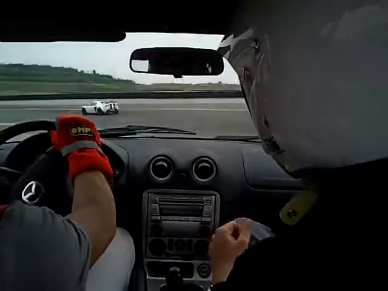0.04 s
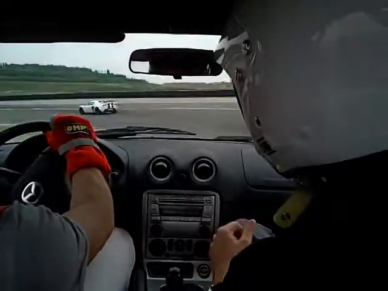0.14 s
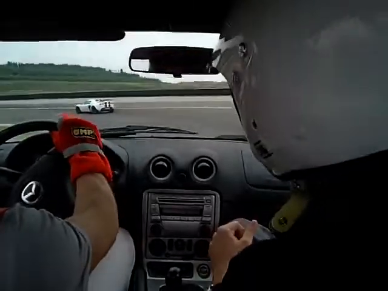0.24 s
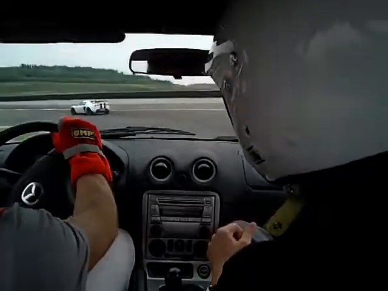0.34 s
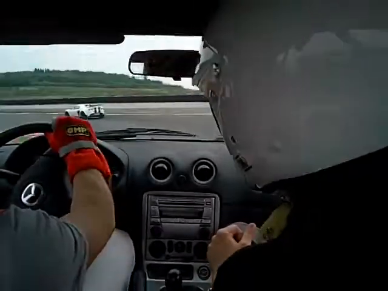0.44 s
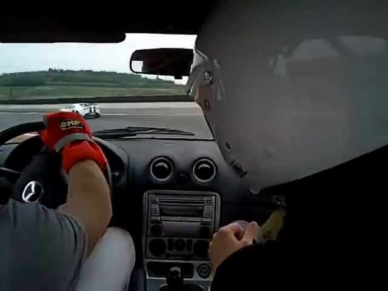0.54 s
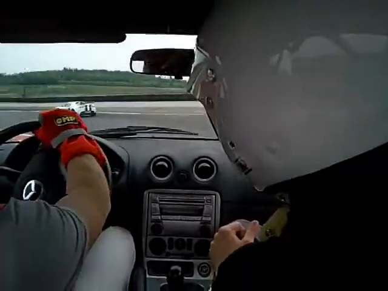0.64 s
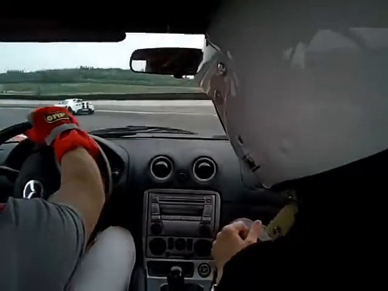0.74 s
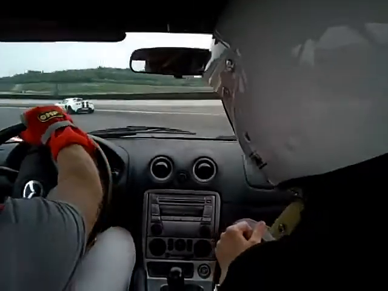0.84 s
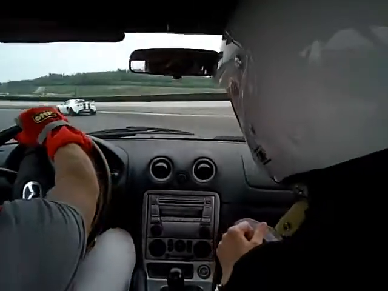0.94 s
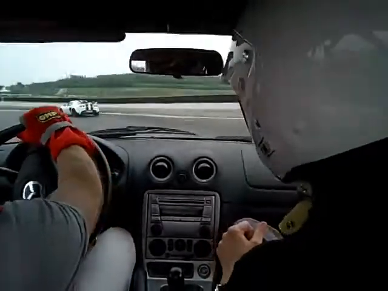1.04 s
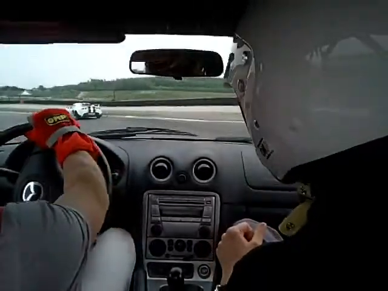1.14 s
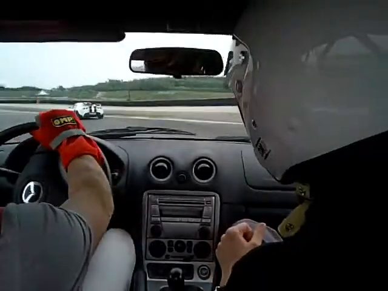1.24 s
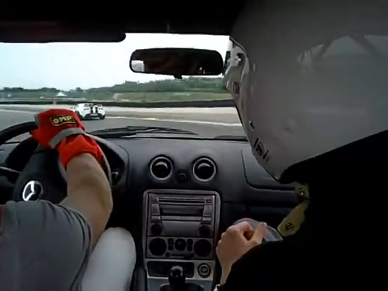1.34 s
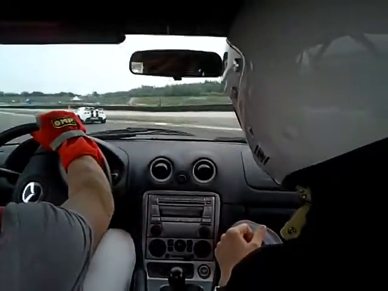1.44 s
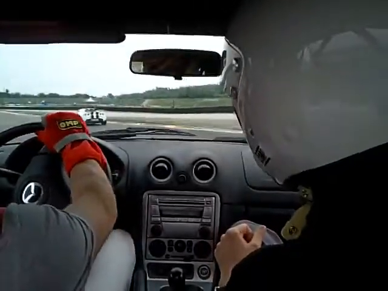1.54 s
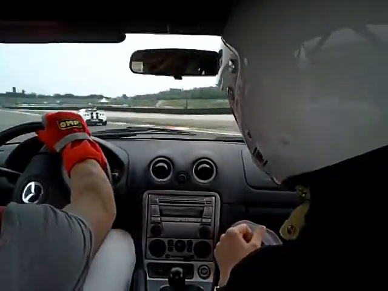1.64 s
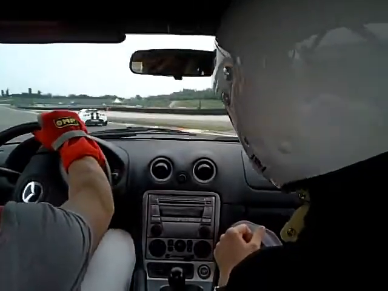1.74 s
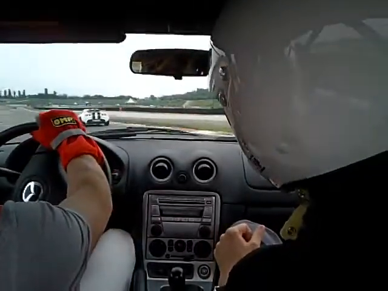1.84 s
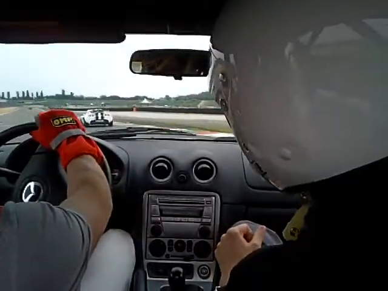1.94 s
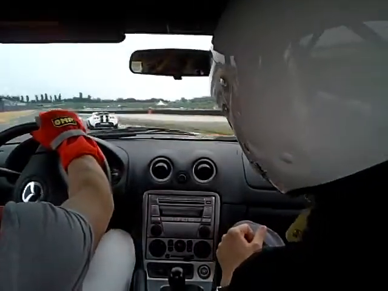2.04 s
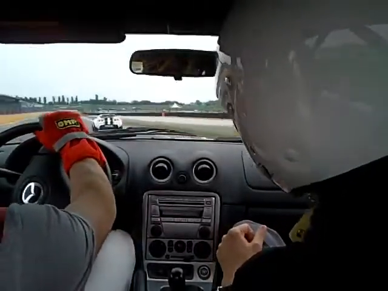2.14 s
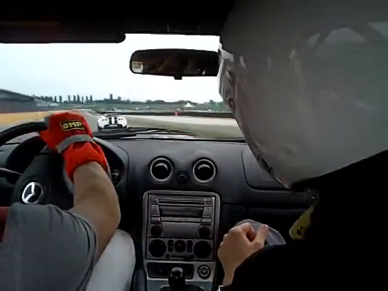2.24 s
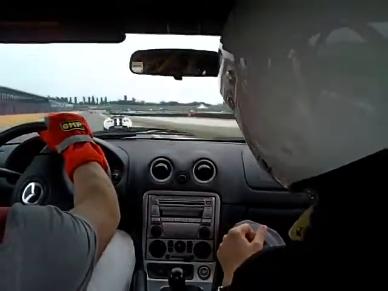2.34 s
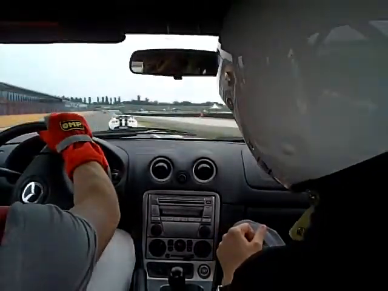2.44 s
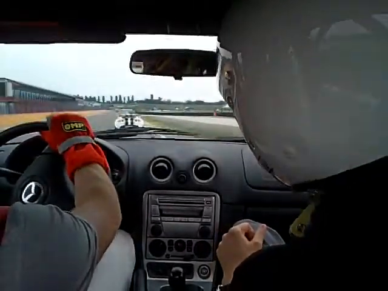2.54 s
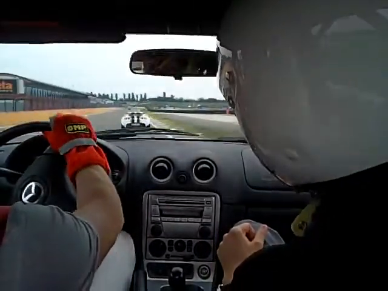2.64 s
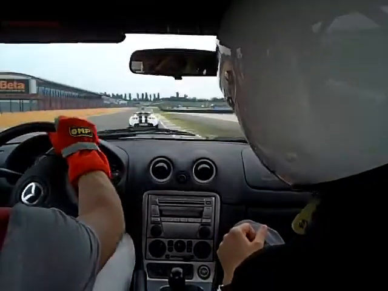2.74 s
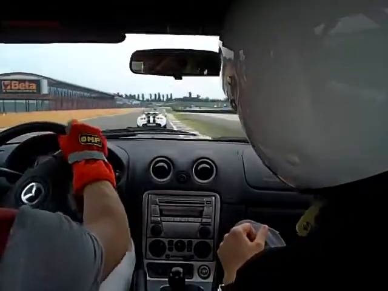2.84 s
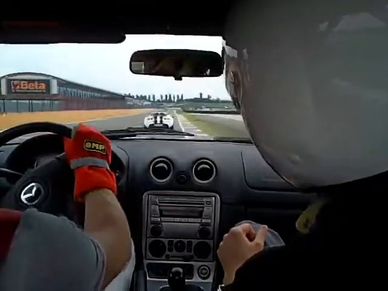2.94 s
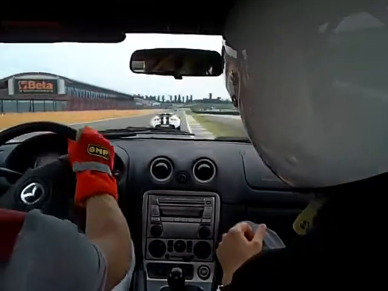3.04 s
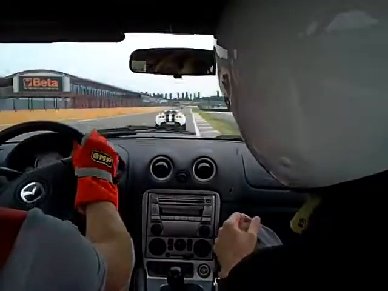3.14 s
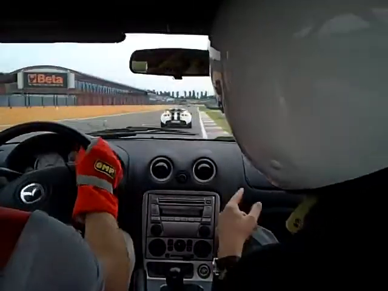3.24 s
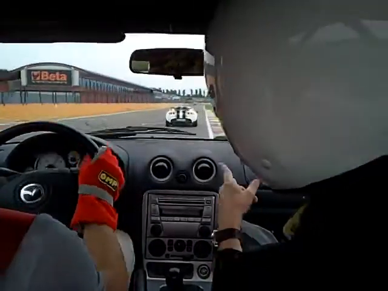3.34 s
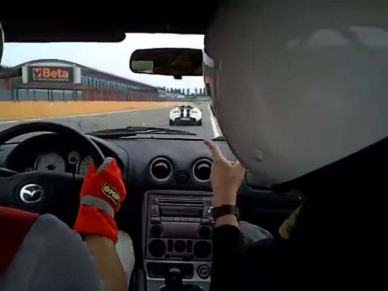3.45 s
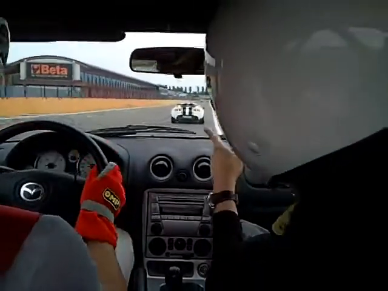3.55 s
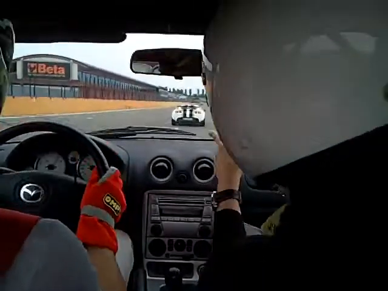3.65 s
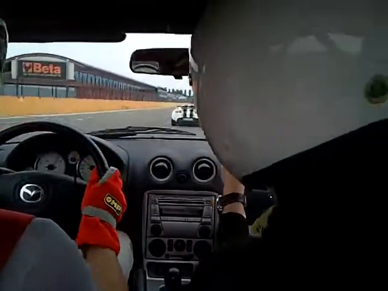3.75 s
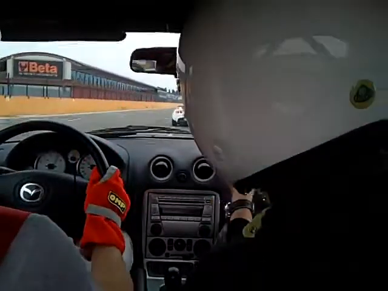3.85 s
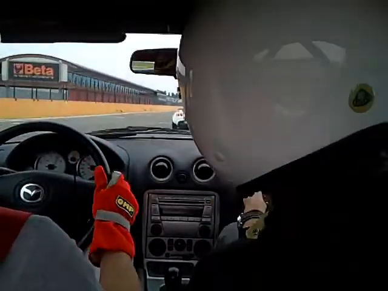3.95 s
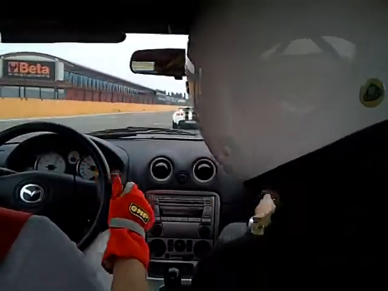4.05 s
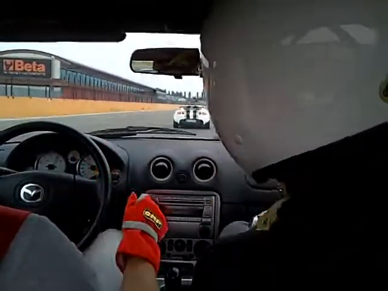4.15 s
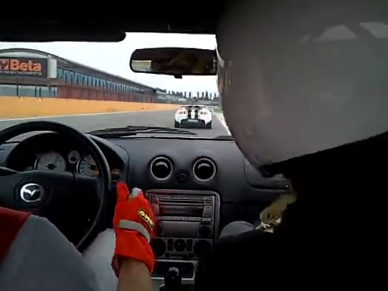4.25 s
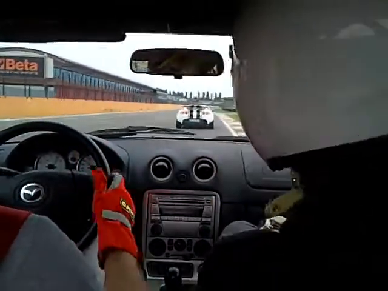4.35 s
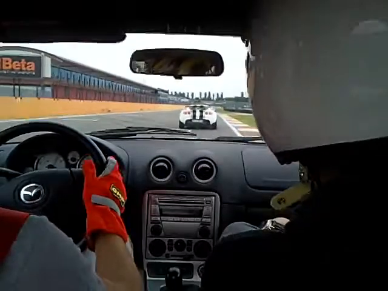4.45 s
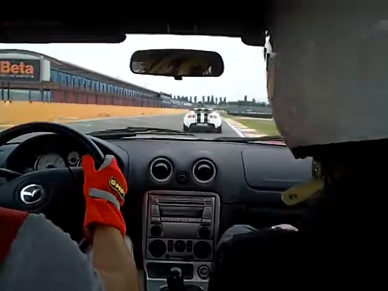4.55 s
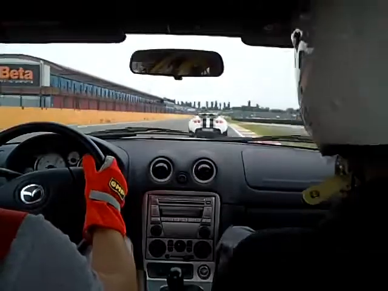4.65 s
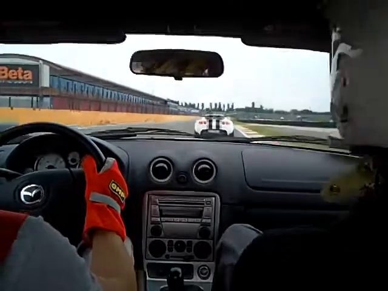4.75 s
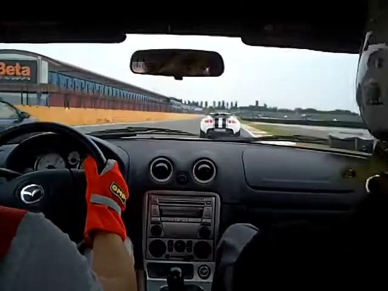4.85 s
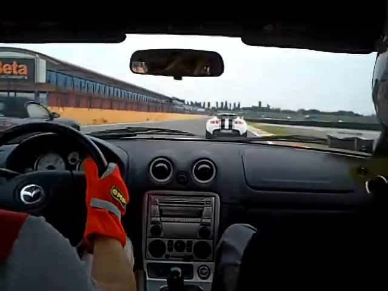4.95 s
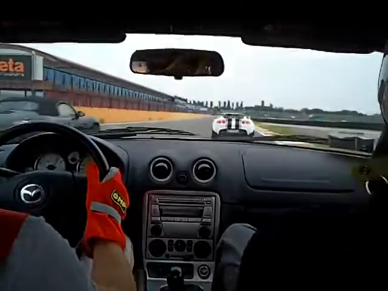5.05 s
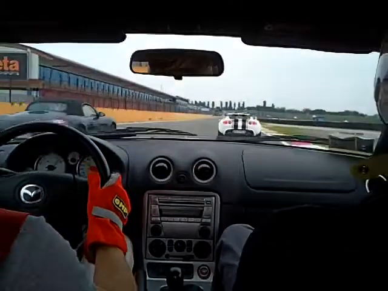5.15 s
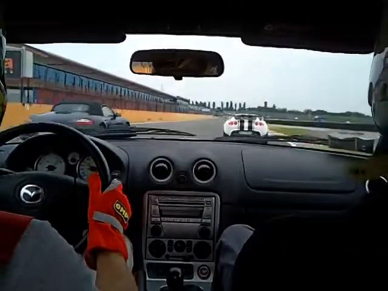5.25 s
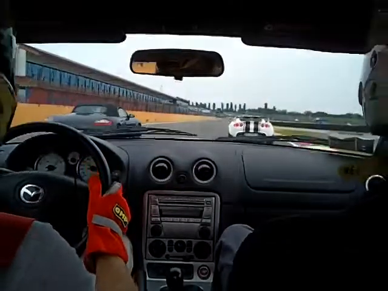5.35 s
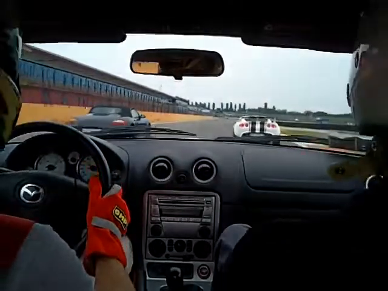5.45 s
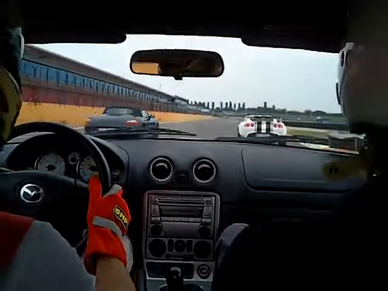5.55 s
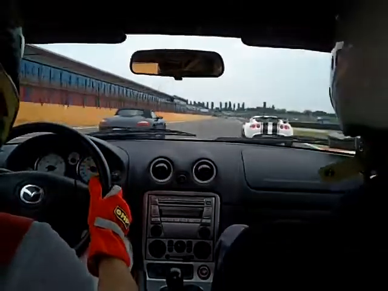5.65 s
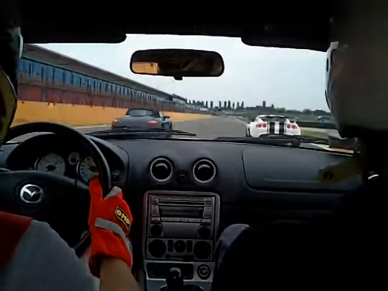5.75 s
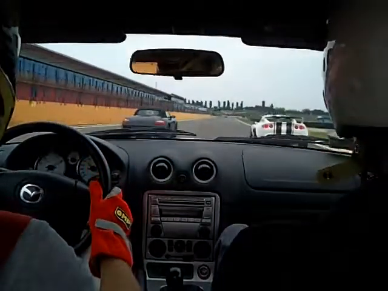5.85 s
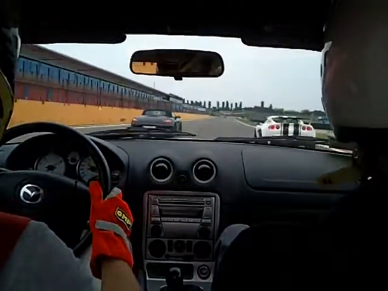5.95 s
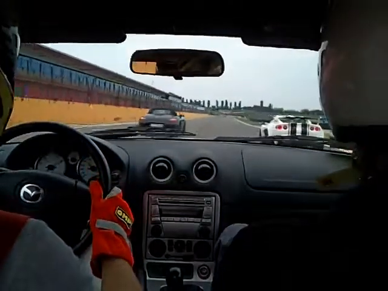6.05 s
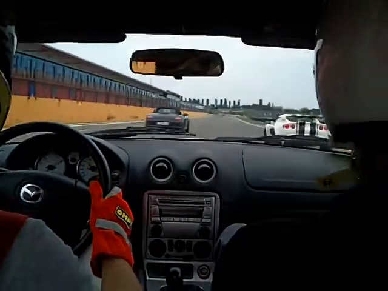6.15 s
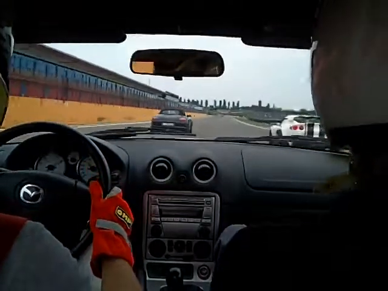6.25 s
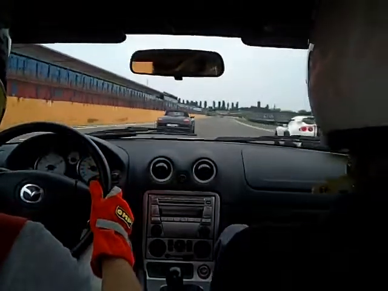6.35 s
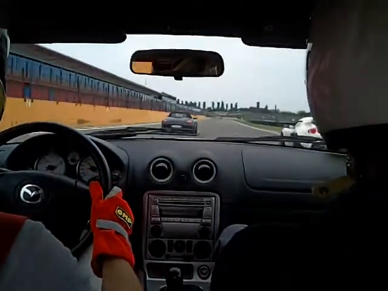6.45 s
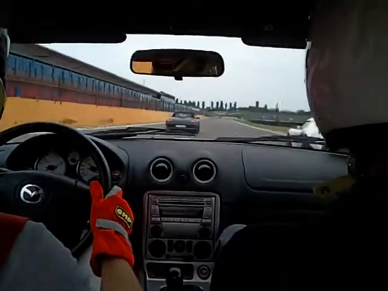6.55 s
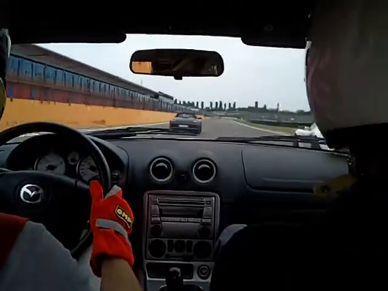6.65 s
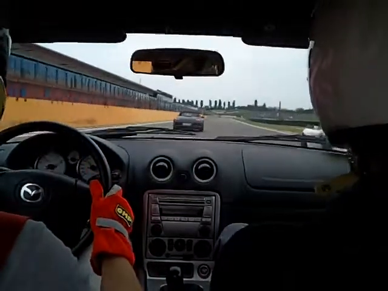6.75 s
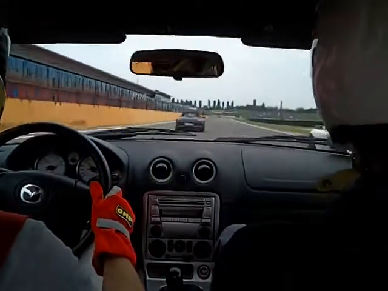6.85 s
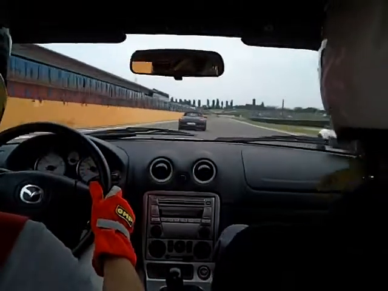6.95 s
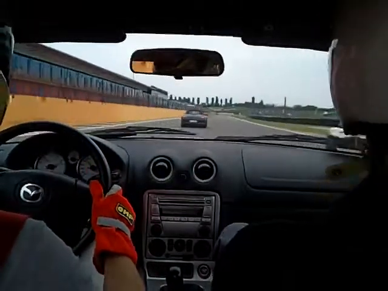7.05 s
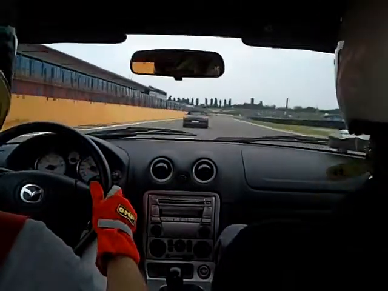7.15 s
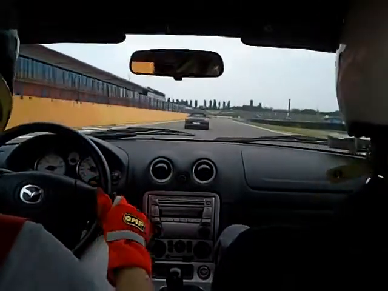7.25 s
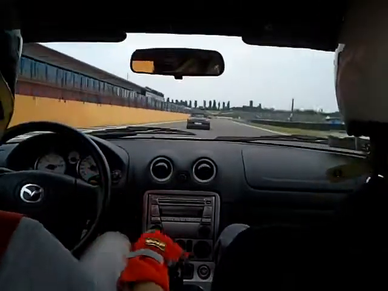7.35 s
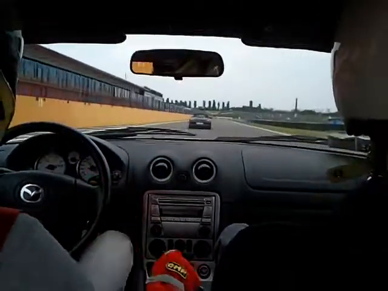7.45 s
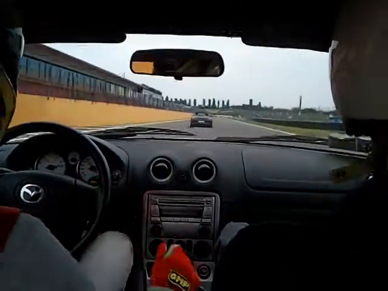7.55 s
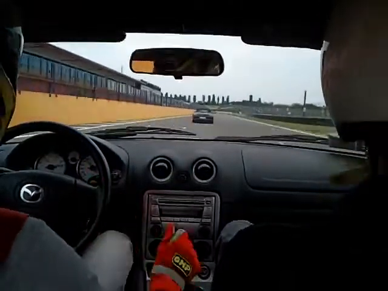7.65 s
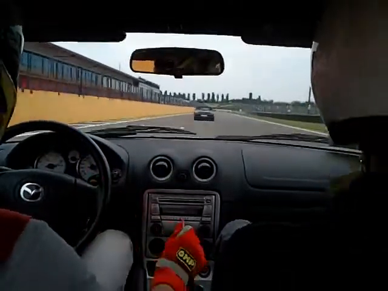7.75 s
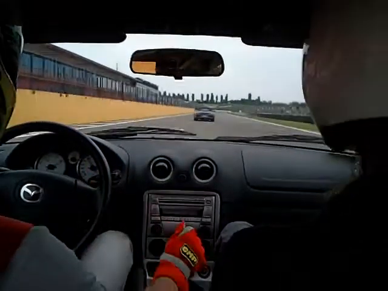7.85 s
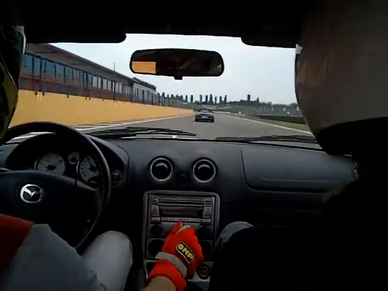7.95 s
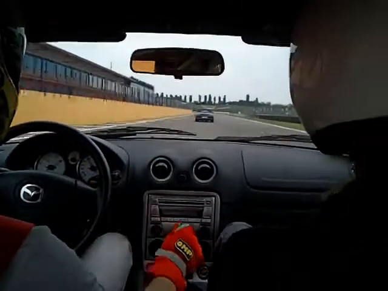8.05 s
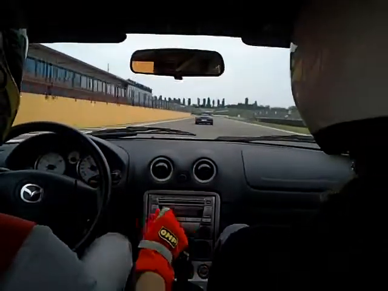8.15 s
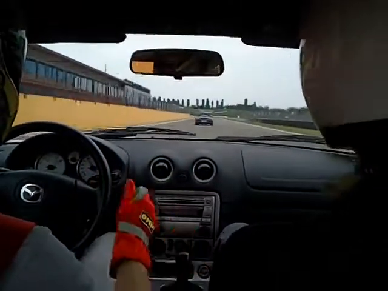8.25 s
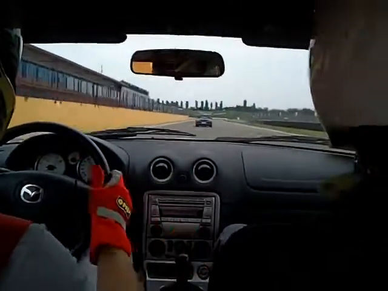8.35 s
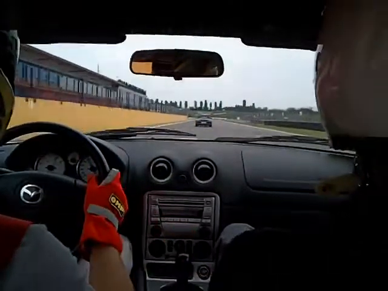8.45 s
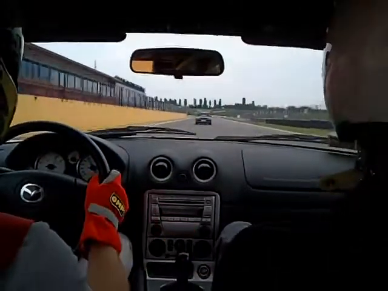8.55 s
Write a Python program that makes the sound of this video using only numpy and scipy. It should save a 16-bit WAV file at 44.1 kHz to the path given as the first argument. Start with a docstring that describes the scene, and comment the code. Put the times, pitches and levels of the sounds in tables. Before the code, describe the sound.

Muffled cabin roar with rattling plastic, a booming four-cylinder engine climbing under full throttle, a passing raspy exhaust, and a sharp pitch drop at a gear change.

```python
"""Tyre and wind noise, a ribbed kerb and rattling trim come first, inside a small car on a race track.
Its four-cylinder engine pulls, eases, pulls hard and drops for an upshift. It is built from multiples
of its cycle rate, called orders, which boom as they sweep through the air modes of the cabin.
Other cars drone as wavering notes; one roars past as uneven exhaust pulses. Road noise is filtered noise.
Trim rattles are short snaps, and a narrow-band microphone clips the loudest peaks."""
import sys
import numpy as np
from scipy import signal
from scipy.fft import rfft, irfft
from scipy.io import wavfile

SR = 44100
rng = np.random.default_rng(int(sys.argv[2]) if len(sys.argv) > 2 else 0)


def master(y):
    """Save y as 16-bit WAV."""
    cut = np.clip(np.atleast_2d(y).T, -1, 1)
    pcm = np.round(cut * 32767)  # scale
    wavfile.write(sys.argv[1], SR, pcm.astype(np.int16))


N = 379260
TIME = np.arange(N) / SR


def amp(db):
    """Turns decibels into gain."""
    return 10 ** (np.asarray(db) / 20)


def unit(x):
    """Scales a sound to rms 1."""
    return x / np.sqrt(np.mean(x ** 2) + 1e-20)


def curves(rows):
    """Joins every column of a table by straight lines in time."""
    s, *columns = np.transpose(rows)
    return [np.interp(TIME, s, column) for column in columns]


def colour(x, points):
    """Filters by a spectrum of (f/Hz, level/dB), joined by straight lines over log frequency."""
    hz, db = np.transpose(points)
    bins_hz = np.fft.rfftfreq(N, 1 / SR)
    gain_db = np.interp(np.log(bins_hz + 1), np.log(hz), db)
    return irfft(rfft(x) * amp(gain_db), N)


def noise(points):
    """Makes noise of rms 1 with the given spectrum."""
    return unit(colour(rng.standard_normal(N), points))


def wander(hz, size=4096):
    """Makes a slow random curve of rms 1, changing up to about the given rate."""
    f = np.fft.rfftfreq(size, TIME[-1] / size)
    spectrum = rfft(rng.standard_normal(size)) / (1 + (f / hz) ** 2)
    slow = unit(irfft(spectrum, size))
    return np.interp(TIME, np.linspace(0, TIME[-1], size), slow)


def angle(hz):
    """Adds up a frequency curve into a running phase in radians."""
    return 2 * np.pi * np.cumsum(hz) / SR


def tone(phase, rough, flutter_hz, order=1):
    """Plays one multiple of a running phase at rms 1, with fluttering height and phase."""
    start = rng.uniform(0, 2 * np.pi)
    height = 1 + rough * wander(flutter_hz)
    slip = rough * wander(flutter_hz)
    return unit(height * np.cos(order * phase + start + slip))


def drone(rows, gain_db, octave_db, rough):
    """Plays a wavering note and its octave, fading in and out at the ends of its table."""
    hz, db = curves(rows)
    to_nearest_end = np.minimum(TIME - rows[0][0], rows[-1][0] - TIME)
    fade = np.clip(to_nearest_end / 0.0098, 0, 1)
    phase = angle(hz)
    note = tone(phase, rough, flutter_hz=16)
    octave = amp(octave_db) * tone(2 * phase, rough, flutter_hz=20)
    return fade * amp(db + gain_db) * (note + octave)


def lowpass(x, hz, size):
    """Cuts everything above a steep band limit."""
    taps = signal.firwin(size, hz, window=("kaiser", 8), fs=SR)
    return signal.oaconvolve(x, taps[None], "same")


# stretches of rough ground that shake the car: (start t/s, end t/s, shake level/dB)
ROUGH_GROUND = [(0.247, 0.782, -1.5), (3.207, 3.706, -3.5), (7.8, 8.05, -12.5)]
SHAKE_RISE_S, SHAKE_FALL_S, SMOOTH_SHAKE_DB = 0.24, 0.14, -13.5


def shaking():
    """How hard the car shakes: it builds up before each rough stretch, holds, and dies away."""
    shake = amp(SMOOTH_SHAKE_DB)
    for start, end, db in ROUGH_GROUND:
        early = np.maximum(start - TIME, 0) / SHAKE_RISE_S
        late = np.maximum(TIME - end, 0) / SHAKE_FALL_S
        shake = shake + amp(db) * np.exp(-early - late)
    return shake


PANEL_DB, PANEL_RISE_DB_PER_S = -14, 0.78  # level against the roar, and its steady growth


def panel(centre_hz=1470, width_hz=70):
    """A singing body panel: noise through one narrow resonance, growing steadily."""
    f = np.fft.rfftfreq(N, 1 / SR)
    resonance = 1 / (1 + ((f - centre_hz) / width_hz) ** 2)
    ring = irfft(rfft(rng.standard_normal(N)) * resonance, N)
    return amp(PANEL_DB + PANEL_RISE_DB_PER_S * TIME) * unit(ring)


# tyre and wind noise before shaking, throttle and passing tyres:
# (t/s, rumble level/dB, roar level/dB, hiss level/dB)
ROAD = [(0, -17.5, -25.5, -41), (.22, -20, -28, -45.5), (.4, -27, -33, -48.5), (1.03, -25, -34, -54.5),
        (1.2, -19, -29, -62), (1.5, -21.5, -32, -48.5), (2.05, -23.5, -31, -49.5),
        (2.4, -23.5, -31.5, -51.5), (3.2, -17, -27.5, -44.5), (3.9, -25.5, -31.5, -47.5),
        (5, -18, -39, -49), (5.5, -27, -37, -49.5), (6.4, -24, -31.5, -47.5), (6.95, -29, -34.5, -48),
        (7.4, -28, -31.5, -48), (8, -28, -35, -49), (8.3, -24.5, -32.5, -45), (8.6, -26.5, -35.5, -51.5)]
# spectra of the three noises, before scaling to rms 1: (f/Hz, level/dB)
RUMBLE_COLOUR = [(15, -21.5), (30, -6), (45, -7.5), (65, -4.5), (110, 3), (160, -1), (205, -3.5), (265, -1),
                 (340, -8.5), (470, -13), (700, -25.5), (1500, -54)]
ROAR_COLOUR = [(150, -11), (350, 1.5), (520, 4.5), (700, -1.5), (900, 1), (1080, -3.5), (1220, 1),
               (1370, -3.5), (1470, -12), (1600, -6), (1850, -11.5), (2300, -19), (3200, -31),
               (4500, -39.5)]
HISS_COLOUR = [(800, -18.5), (1600, -3), (2400, 0.5), (3100, -5.5), (3800, -8.5), (4400, -26.5),
               (6000, -16.5)]
# the tyres hit a ribbed kerb, skip, then hum along it: (t/s, f/Hz, level/dB before gain_db)
KERB_HUM = [(.21, 103.2, -35), (.25, 109, -4), (.315, 109, -22.5), (.38, 105, -12), (.82, 106.1, -14),
            (.93, 105.7, -28.5)]
# the tyres sing in the bend: (t/s, f/Hz, level/dB before gain_db)
TYRE_SONG = [(1.02, 905, -46), (1.17, 895, -35), (1.4, 916, -40)]
SHAKE_RUMBLE_DB, SHAKE_ROAR_DB = -21, -35.5  # added at a shake of 1
ROAR_THROTTLE_DB = 3.5  # lift from the rush of gas at full throttle
PASS_TYRES_DB = -22.5  # roar of the passing car at its closest


def road(cycle, throttle, shake):
    """Rumble and roar grow on rough ground; roar and hiss pulse with the engine and gust."""
    rumble_db, roar_db, hiss_db = curves(ROAD)
    # ripples at four, two and one per engine cycle
    pulsing = 1 + 0.26 * np.cos(4 * cycle) + 0.021 * np.cos(2 * cycle) + 0.11 * np.cos(cycle)
    gust = amp(1.2 * wander(hz=22))
    # independent noises add by power
    own_roar = np.hypot(amp(roar_db + ROAR_THROTTLE_DB * throttle), amp(SHAKE_ROAR_DB) * shake)
    roar_level = np.hypot(own_roar, amp(PASS_TYRES_DB) * nearness())
    rumble_level = np.hypot(amp(rumble_db), amp(SHAKE_RUMBLE_DB) * shake)
    rumble = rumble_level * noise(RUMBLE_COLOUR)
    rush = roar_level * noise(ROAR_COLOUR) + amp(hiss_db) * noise(HISS_COLOUR)
    kerb = drone(KERB_HUM, gain_db=0.8, octave_db=-27.5, rough=0.08)
    song = drone(TYRE_SONG, gain_db=2.5, octave_db=-24, rough=0.76)
    return rumble + kerb + song + unit(pulsing) * gust * rush + roar_level * panel()


# a faint high squeal: (t/s, f/Hz, level/dB before gain_db)
SQUEAL = [(2.83, 3720, -68), (2.94, 3740, -62), (3.06, 3700, -62)]


def squeal():
    """A thin wavering note with almost no octave."""
    return drone(SQUEAL, gain_db=4, octave_db=-43, rough=.35)


# thuds from the suspension: (t/s, level/dB)
JOLTS = [(.24, -14), (0.431, -14.5), (0.559, -22), (3.21, -27), (3.37, -15), (3.701, -20), (7.38, -18),
         (8.42, -22)]


def jolts(ring_hz=48, t60=0.17):
    """The suspension takes a bump and the body thuds: a low sine that dies away."""
    thuds = np.zeros(N)
    for s, db in JOLTS:
        age = np.maximum(TIME - s, 0)
        thuds += amp(db - 60 * age / t60) * np.sin(2 * np.pi * ring_hz * age)
    return thuds


# bumps and gear-change knocks that shake the body: (t/s, level/dB, time to fall 60 dB t/s)
BUMPS = [(2.286, -12, 0.17), (2.331, -23.5, 0.52), (3.304, -22.5, 0.11), (7.786, -22.5, 0.069),
         (7.87, -24, 0.12), (7.969, -19, 0.062), (8.425, -21.5, 0.067)]


def bumps(rise=0.0027):
    """A jolt sets all the panels clattering at once: noise that rises fast and dies away."""
    level = np.zeros(N)
    for s, db, t60 in BUMPS:
        attack = np.clip((TIME - s) / rise, 0, 1)
        level += attack * amp(db - 60 * np.maximum(TIME - s, 0) / t60)
    clatter = noise([(200, -6.5), (650, 8), (860, 10.5), (1100, -1.5), (1400, 7), (1800, -8.5),
                     (2400, -13.5), (3600, -19.5), (5000, -34.5)])
    return level * clatter


# the loudest trim rattles: (t/s, level/dB before the common lift and the filter)
RATTLES = [(0.2572, -21), (0.28, -21), (0.5708, -20), (0.6487, -30.5), (0.7817, -31.5), (0.828, -21),
           (0.9333, -19), (0.994, -24), (1.39, -26), (1.462, -25), (3.2312, -15), (3.2433, -17),
           (3.2515, -11.5), (3.269, -15), (3.3533, -18), (3.4353, -14), (3.4712, -17.5), (3.5554, -18),
           (3.592, -21), (3.7305, -19.5), (3.9213, -25), (6.853, -21.5)]
# spectrum of loose trim: (f/Hz, level/dB)
RATTLE_COLOUR = [(200, -22.5), (700, -10.5), (1500, 7.5), (2200, 1.5), (3000, -6), (4200, -13), (6000, -15)]
CHATTER_DB, SNAP_DB = -40, -15  # at a shake of 1; snaps before the filter
CHATTER_PER_S, SNAPS_PER_S = 200, 34  # average rates; snaps scale with shake squared


def rattles(shake, ring_t60=0.024, snap=2.57, ring_share=0.19, spread_db=3):
    """Loose plastic trim snaps with very short rings; shaking adds lighter snaps and fine chatter."""
    t = TIME[:2048]
    touching = rng.random(N) < shake ** 2 * SNAPS_PER_S / SR
    contacts = touching * shake * amp(SNAP_DB + spread_db * rng.uniform(-1, 1, N))
    grains = (rng.random(N) < CHATTER_PER_S / SR) * rng.standard_normal(N)
    # each hit is a decaying burst of noise with a sharp first sample
    hits = ring_share * rng.standard_normal((len(RATTLES) + 1, len(t))) * amp(-60 * t / ring_t60)
    hits[:, 0] += snap
    snaps = signal.oaconvolve(contacts, hits[0])
    for (s, db), hit in zip(RATTLES, hits[1:]):
        first = round((s + .001) * SR)
        snaps[first:][:len(t)] += amp(db + 11.0) * hit
    chatter = amp(CHATTER_DB) * shake * unit(colour(grains, RATTLE_COLOUR))
    return colour(snaps[:N], RATTLE_COLOUR) + chatter


# a car ahead pulls out of the bend and lifts: (t/s, f/Hz, level/dB before gain_db)
CAR_AHEAD = [(1, 105.7, -31), (1.22, 109.2, -15.5), (1.5, 112.5, -25), (1.8, 115.5, -16.5),
             (2.7, 124.6, -20), (2.9, 123.2, -19), (3.1, 107.9, -20.5), (3.23, 104.6, -14.5),
             (3.33, 100.5, -39)]
# two more cars drone nearby: (t/s, f/Hz, level/dB before gain_db)
CAR_CLOSING = [(3.25, 171, -39), (3.38, 174.7, -13.5), (3.49, 168.3, -23), (3.6, 170.4, -15.5),
               (4, 171.4, -21), (4.2, 167.3, -17.5), (4.46, 162.5, -15.5), (4.58, 176, -16),
               (4.68, 175, -28)]
CAR_ALONGSIDE = [(4, 88, -32.5), (4.3, 88.3, -27), (4.9, 91.3, -21.5), (5.5, 94.4, -23), (6.5, 99.2, -22),
                 (7.5, 103.7, -21), (8, 104.2, -25.5), (8.6, 104, -28.5)]
# the thin overtone of the car alongside: (t/s, f/Hz, level/dB before gain_db)
WHINE = [(7.25, 615, -53), (7.55, 612.6, -30.5), (7.8, 617.4, -34.5), (8, 631.6, -41)]


def traffic():
    """The cars around, mostly bass through the closed body: wavering notes with weak octaves."""
    ahead = drone(CAR_AHEAD, gain_db=-1.6, octave_db=-17.0, rough=0.18)
    closing = drone(CAR_CLOSING, gain_db=-1.0, octave_db=-27.5, rough=0.028)
    alongside = drone(CAR_ALONGSIDE, gain_db=1.7, octave_db=-18.5, rough=0.023)
    whine = drone(WHINE, gain_db=-1.0, octave_db=-17.0, rough=0.06)
    return ahead + closing + alongside + whine


# engine speed of the passing car, in four-stroke cycles per second: (t/s, f/Hz)
OVERTAKER = [(3.901, 39.96), (4.45, 40.99), (4.7, 42.22), (4.86, 42.78), (5.131, 44.06), (5.899, 40.7)]
PASS_S, PASS_WIDTH_S = 4.72, 0.18  # when it is closest, and how long it takes to cover that distance
PASS_FADE_S = 0.23


def nearness():
    """One over the distance to the passing car, 1 at its closest, faded at both ends."""
    to_nearest_end = np.minimum(TIME - OVERTAKER[0][0], OVERTAKER[-1][0] - TIME)
    in_earshot = np.clip(to_nearest_end / PASS_FADE_S, 0, 1)
    return in_earshot / np.hypot(1, (TIME - PASS_S) / PASS_WIDTH_S)


def scatter(x, t60=0.049, size=4096):
    """Many short paths, off the road, the wall and the glass, smear each pulse."""
    paths = rng.standard_normal(size) * amp(-60 * TIME[:size] / t60)
    # keep only the random phases: the paths blur the attack and keep the colour
    flat = irfft(np.exp(1j * np.angle(rfft(paths))), size)
    fade_out = signal.windows.hann(2 * size)[size:]
    return signal.oaconvolve(x, flat * fade_out)[:N]


# barks of the passing exhaust: (t/s, half length t/s, level/dB)
BARKS = [(4.662, 0.026, -32), (4.747, 0.013, -23.5), (5.19, 0.035, -31)]
# spectrum of the passing exhaust, before scaling to rms 1: (f/Hz, level/dB)
BARK_COLOUR = [(40, -43), (200, -19), (340, -3.5), (440, 7), (580, -15), (675, 5), (790, -3), (1000, -1),
               (1300, -11), (1800, -12.5), (2150, -13.5), (2700, -23.5), (4400, -43.5)]
PASS_EXHAUST_DB, PASS_NOTE_DB = -23, -14  # exhaust and its note when closest


def overtaker(uneven=0.23, gas=1.0):
    """An open exhaust passes close by: unequal pulses, each with a puff of gas."""
    cycle_hz = curves(OVERTAKER)[0]
    level = amp(PASS_EXHAUST_DB) * nearness()
    for s, half, db in BARKS:
        level += amp(db) * np.exp(-((TIME - s) / half) ** 2)
    firing = np.cumsum(4 * cycle_hz) / SR  # firings so far, four a cycle
    beat = np.floor(firing).astype(int)
    cylinder = np.take([1.1, 0.54, 1.3, 0.44], beat, mode="wrap")
    pulses = np.diff(beat, prepend=0) * cylinder * (1 + uneven * rng.standard_normal(N))
    puffs = cylinder * np.exp(-(firing % 1) / 0.36) * rng.standard_normal(N)
    exhaust = unit(colour(scatter(unit(pulses) + gas * unit(puffs)), BARK_COLOUR))
    # squaring the nearness lets the note be heard only close by
    note_level = amp(PASS_NOTE_DB) * nearness() ** 2
    note = note_level * tone(angle(cycle_hz), order=8, rough=0.26, flutter_hz=20)
    return note + level * exhaust


# air modes of the cabin, which lift each order as it sweeps through: (f/Hz, width f/Hz, level/dB)
CABIN = [(144.5, 15, -1), (175, 32, -1.64), (200, 21, -2), (218, 16, -7.5), (246, 33, 2.5),
         (267.7, 6.8, 3.5), (317.9, 10, 4.5), (336.5, 26, 1.5), (380.2, 12, -2.5), (403.6, 9.6, 0.5),
         (416.9, 21.8, 0)]
BETWEEN_MODES_DB = -20


def cabin(hz):
    """Gain of the cabin's air modes at a moving frequency, adding their powers."""
    power = amp(BETWEEN_MODES_DB) ** 2
    for centre, width, db in CABIN:
        power = power + amp(db) ** 2 / (1 + (2 * (hz - centre) / width) ** 2) ** 2
    return np.sqrt(power)


def under_load(throttle, levels):
    """Blends three levels, given for coasting, half throttle and wide open."""
    return np.interp(throttle, [0, .5, 1], levels)


def upper_orders(start_db=-17.0, step_db=0.58, firing_db=5, count=24):
    """From order 20 the series falls evenly; multiples of the firing rate stand out."""
    return [(20 + k, start_db - step_db * k + firing_db * (k % 4 == 0)) for k in range(count)]


# engine speed in four-stroke cycles per second, before a tiny wander: (t/s, f/Hz)
REVS = [(0, 39.26), (.55, 37.55), (1.05, 37.7), (1.5, 38.88), (2, 40.26), (2.5, 41.84), (3.08, 43.5),
        (3.3, 41.06), (4.08, 40.2), (4.8, 43.06), (5.5, 46.45), (6.5, 51.16), (7.55, 55.22), (7.65, 52.1),
        (8, 45.6), (8.15, 45.2), (8.43, 39.13), (8.6, 40.1)]
# the booming orders, before the cabin gain:
# (multiple of the cycle rate, coasting level/dB, half-throttle level/dB, wide-open level/dB)
BOOM = [(3, -43.5, -31.5, -23.5), (4, -25.5, -19.5, -6.5), (5, -54, -36, -16), (6, -24.5, -33, -28),
        (8, -47, -19.5, -19.5)]
# order 7 growls as the clutch bites: (t/s, level/dB)
GROWL = [(8.05, -57), (8.2, -50), (8.36, -13.5), (8.47, -20.5), (8.6, -32)]
# the weaker orders, before the even-order lift and wander:
# (multiple of the cycle rate, level/dB against the rasp)
ORDERS = [(7, 3), (9, -2.5), (10, -2.5), (11, -1), (12, -3.5), (13, -5.5), (14, -9), (15, -4.5),
          (16, -10.5), (17, -6.5), (18, -15.5), (19, -18.5)]
# lift of the even weaker orders: coasting, half-throttle, wide-open level/dB
EVEN_ORDERS_DB = [1.5, 3, -1]
RASP_COAST_DB, RASP_PULL_DB = -47, -34.5  # coasting, and from half throttle up


def engine(throttle):
    """Four firings a cycle; unequal cylinders fill in the orders between. Returns sound and phase."""
    cycle_hz = curves(REVS)[0]
    cycle = angle(cycle_hz * (1 + 0.0013 * wander(hz=10.9)))
    boom = amp(curves(GROWL)[0]) * tone(cycle, order=7, rough=0.24, flutter_hz=20)
    for k, *load_db in BOOM:
        k = round(k)
        level = amp(under_load(throttle, load_db)) * cabin(k * cycle_hz)
        boom += level * tone(cycle, order=k, rough=0.018 * k, flutter_hz=21.8)
    # higher up the modes crowd together, so each order swells, fades and slips in phase by chance
    even_db = under_load(throttle, EVEN_ORDERS_DB)
    rasp = np.zeros(N)
    for k, db in ORDERS + upper_orders():
        k = round(k)
        level = amp(db + even_db * (k % 2 == 0) + 2.6 * wander(hz=2.2))
        slipping = cycle + 1.6 * wander(hz=.7) / k
        rasp += level * tone(slipping, order=k, rough=0.2, flutter_hz=9)
    rasp_level = amp(under_load(throttle, [RASP_COAST_DB, RASP_PULL_DB, RASP_PULL_DB]))
    return boom + rasp_level * rasp, cycle


# the driver's foot: (t/s, throttle 0-1)
THROTTLE = [(0, 0.12), (.4, 0.3), (1.25, 0.05), (1.52, 0.56), (2.85, 0.5), (3.35, 0.08), (3.95, .02),
            (4.15, 0.38), (4.72, 0.41), (4.79, 1), (7.52, 0.9), (7.6, 0.28), (8.06, 0.01), (8.11, 0.83),
            (8.24, 0.88), (8.34, 0.52), (8.6, .36)]


def scene():
    """Adds up everything heard between the seats, with throttle and shaking shared by the sources."""
    throttle, shake = curves(THROTTLE)[0], shaking()
    motor, cycle = engine(throttle)
    body = rattles(shake) + bumps() + jolts() + squeal()
    return (motor + traffic() + overtaker() + road(cycle, throttle, shake) + body)[None]


# a lone dry tick: (t/s, height before the band limit)
TICK = (4.4973, .34)


def tick(fall=.0004):
    """One sudden step that relaxes at once."""
    s, height = TICK
    return height * (TIME >= s) * np.exp(-abs(TIME - s) / fall)


# treble of the whole sound: a steep fall above 4.2 kHz, with faint bands near 7 and 10 kHz: (f/Hz, level/dB)
TREBLE_COLOUR = [(4200, 0), (4480, -6), (4720, -15.5), (6000, -23.5), (7000, -13.5), (8300, -28.5),
                 (10000, -25.5), (11500, -56.5)]
EDGE_HZ = 15800  # upper band limit


def record(dry):
    """The treble falls away, a dry tick is added, peaks overload at full scale, then the band limit."""
    ends = np.clip(np.minimum(TIME, TIME[-1] - TIME) / .004, 0, 1)
    heard = colour(dry * ends, TREBLE_COLOUR) + tick()
    return lowpass(np.clip(heard, -1, 1), EDGE_HZ, size=511)


dry = scene()
out = record(dry)
master(out)
```